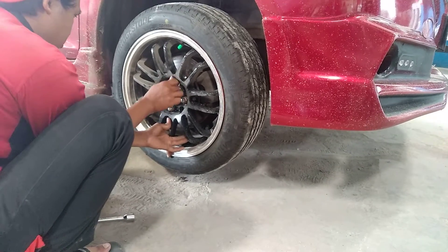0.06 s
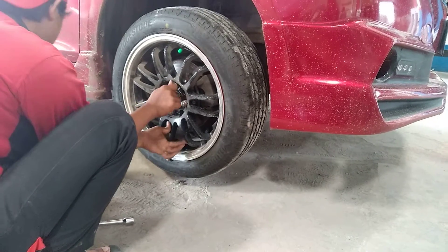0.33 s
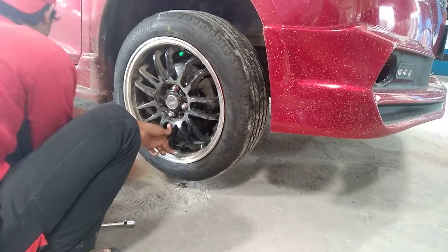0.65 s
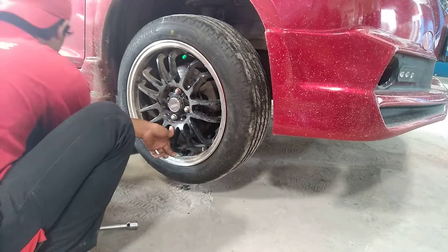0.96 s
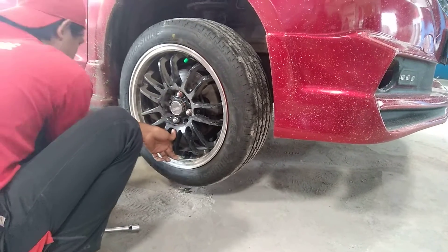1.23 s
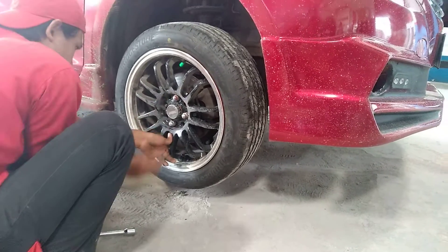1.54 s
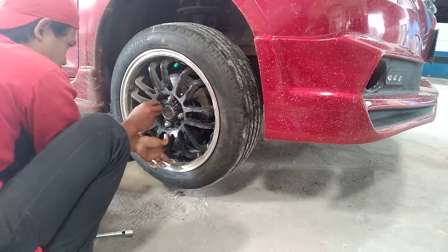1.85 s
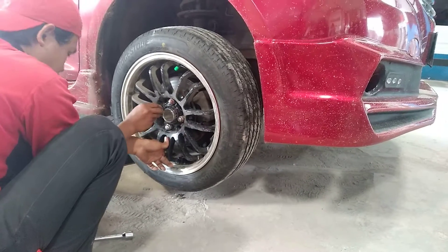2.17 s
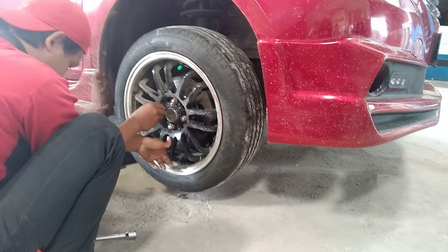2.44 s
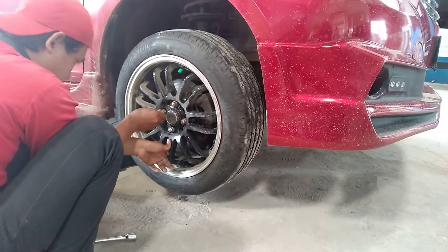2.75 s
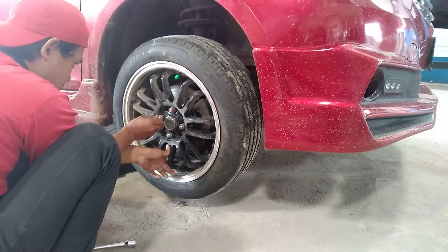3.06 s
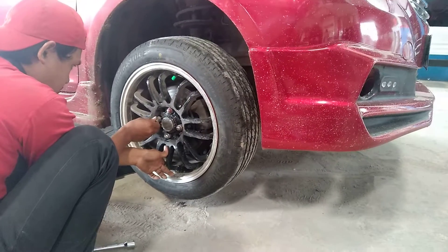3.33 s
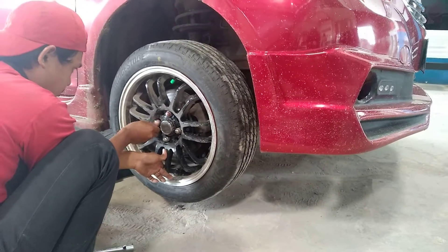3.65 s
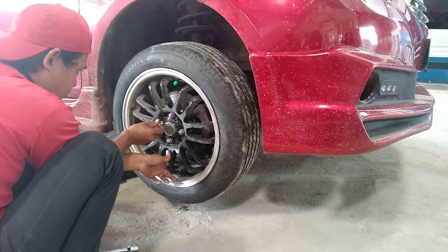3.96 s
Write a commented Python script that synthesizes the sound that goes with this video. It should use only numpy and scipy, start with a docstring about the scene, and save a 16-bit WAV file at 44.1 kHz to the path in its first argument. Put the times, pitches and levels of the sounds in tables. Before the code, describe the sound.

A steady rush of workshop fans with a low motor hum and rumble.

```python
"""Car workshop

Fans and machinery fill the room with a steady rush, a low rumble, faint tones and a thin high whine.
A motor hums at 200 Hz and is switched off near the end. Further away an engine slows down,
with a swell of hiss and a faint squeal of rubbing metal. A wheel nut turned by hand gives one
soft tick, then hands brush over the wheel."""
import sys
import numpy as np
from scipy import signal
from scipy.fft import rfft, irfft
from scipy.io import wavfile
from scipy.ndimage import uniform_filter1d

SR = 44100
rng = np.random.default_rng(int(sys.argv[2]) if len(sys.argv) > 2 else 0)


def dump_mix(stems):
    """Bounce the given channels to the path in sys.argv[1] as a 16-bit WAV at rate SR."""
    frames = np.atleast_2d(stems).T  # one column per channel
    limited = np.clip(frames, -1, 1)  # hard clip at full scale
    pcm = np.round(limited * 32767).astype(np.int16)
    wavfile.write(sys.argv[1], SR, pcm)


N = 176400
T = np.arange(N) / SR


def amp(db):
    """Decibels to gain."""
    return 10 ** (np.asarray(db) / 20)


def unit(x):
    """Scales to rms 1."""
    return x / np.sqrt(np.mean(abs(x) ** 2) + 1e-30)


def curve(rows):
    """An automation lane: straight lines through (time [s], value) points."""
    times, values = np.transpose(rows)
    return np.interp(T, times, values)


def bell(centre, half):
    """A smooth fade in and out, 8.7 dB down at half seconds either side of the centre."""
    return np.exp(-((T - centre) / half) ** 2)


def coloured(points):
    """Noise shaped by an EQ curve of (frequency [Hz], level [dB]) points, rms 1."""
    hz = np.fft.rfftfreq(N, 1 / SR)
    point_hz, point_db = np.transpose(points)
    eq = amp(np.interp(np.log(hz + 1), np.log(point_hz + 1), point_db))
    return unit(irfft(rfft(rng.standard_normal(N)) * eq, N))


def drift(rate):
    """Slow random motion up to about the given rate in Hz, rms 1."""
    hz = np.fft.rfftfreq(N, 1 / SR)
    return unit(irfft(rfft(rng.standard_normal(N)) * (hz > 0) / (1 + (hz / rate) ** 2), N))


def whistle(hz, width):
    """A noisy resonance round a pitch, rms 1."""
    carrier = np.exp(2j * np.pi * np.cumsum(hz * np.ones(N)) / SR)
    return unit((carrier * (drift(width) + 1j * drift(width))).real)


def turbulent(x, patchy_db, flicker_db):
    """Roughens a noise: small patches of the spectrum come and go, and the whole flickers; rms 1."""
    spectrum = signal.stft(x, nperseg=512, noverlap=384)[2]
    patches = uniform_filter1d(rng.standard_normal(spectrum.shape), size=9, axis=0)  # across frequency
    patches = unit(uniform_filter1d(patches, size=22, axis=1))  # across time
    mottled = signal.istft(spectrum * amp(patchy_db * patches), nperseg=512, noverlap=384)[1][:N]
    return unit(mottled * amp(flicker_db * drift(13)))


def add(mix, s, sound):
    """Mixes a sound in at a time in seconds."""
    part = mix[round(s * SR):][:len(sound)]
    part += sound[:len(part)]


def fans():
    """The bed: rushing air with wavering tones and whines, over the room's rumble; all sink slowly."""
    # EQ of the machinery rush (frequency [Hz], relative level [dB])
    rush_eq = [(150, -31), (250, -5), (313, 1.7), (378, -4.5), (450, -2.5), (657, -4.5), (729, -2.5),
               (928, -7), (1010, -5), (1270, -7.5), (1820, -8), (3050, -14), (8160, -24.5), (8750, -27),
               (10900, -35), (13200, -33), (15500, -43)]
    # fan tones and whines (pitch [Hz], width [Hz], level before the fade [dB])
    fan_tones = [(519, 33, -53), (753, 1.6, -55), (844, 3, -59.5), (1105, 7.3, -65), (1544, 15, -57.5),
                 (1811, 220, -56.5), (3297, 190, -59), (4010, 79, -65.5), (4340, 130, -61),
                 (6570, 530, -64), (8840, 81, -63.5), (9040, 43, -75), (10230, 300, -71.5),
                 (12880, 200, -77)]
    # EQ of the room's rumble (frequency [Hz], relative level [dB])
    rumble_eq = [(8, -21), (25, -5), (38, 2), (70, -2), (88, 0), (103, -2), (140, -2.5), (178, -7.5),
                 (270, -12), (400, -26), (800, -64)]
    waver_db, air_db_per_s, rumble_db_per_s = 1.1, -0.5, -0.86
    rush = amp(-38.5) * turbulent(coloured(rush_eq), patchy_db=0.5, flicker_db=0.37)
    whines = sum(amp(db + waver_db * drift(2.7)) * whistle(hz, width) for hz, width, db in fan_tones)
    rumble = amp(-35.5) * coloured(rumble_eq)
    since = T - 2.6  # both fades pass through unity gain at 2.6 s
    return (rush + whines) * amp(air_db_per_s * since) + rumble * amp(rumble_db_per_s * since)


def motor():
    """A clean mains-locked hum that dies away in the room once the motor is switched off."""
    # envelope of the running hum (time [s], level [dB])
    envelope = [(0, -30.5), (.28, -28), (.6, -29), (.8, -30.7), (1, -29), (1.4, -30.5), (1.65, -31.5),
                (1.85, -29.7), (2.8, -30.5), (3.3, -31.5)]
    hum_hz, off_s, t60_s = 200.4, 3.307, 0.87
    phase = 2 * np.pi * hum_hz * T + 0.034 * drift(2.5)
    running_db = curve(envelope) + 0.38 * drift(2.5)
    decay_db = 60 * np.maximum(T - off_s, 0) / t60_s
    return np.sqrt(2) * amp(running_db - decay_db) * np.sin(phase)


def engine():
    """A distant engine slows down; only its lowest orders carry into the room."""
    # falling engine speed (time [s], firing rate [Hz])
    speed = [(0, 50.93), (.65, 49.8), (1.3, 45.2), (1.8, 42.6), (2.3, 37.93), (2.8, 35.02), (4, 34.77)]
    # level of the drone, which swells and dips as it glides (time [s], level [dB])
    envelope = [(0, -28), (.17, -23.5), (.3, -28.5), (.45, -22), (.58, -29), (.68, -24), (.82, -33.5),
                (1.05, -41), (1.25, -34), (1.37, -24.5), (1.48, -41), (1.55, -23.5), (1.66, -29),
                (1.79, -21.5), (1.95, -36), (2.13, -44), (2.31, -30), (2.5, -42), (3.25, -36), (4, -42.5)]
    # engine orders (multiple of the firing rate, relative level [dB])
    orders = [(1, -4.5), (1.5, -19.5), (2, -25), (3, -26.5)]
    firings = np.cumsum(curve(speed) * (1 + 0.0084 * drift(4.3))) / SR
    drone = sum(amp(db + 1.9 * drift(4.4)) * np.sin(2 * np.pi * (order * firings + rng.random()))
                for order, db in orders)
    return np.sqrt(2) * amp(curve(envelope)) * drone


def hiss():
    """A soft upper-mid hiss that builds, crests and drops away."""
    # envelope of the swell (time [s], level [dB])
    envelope = [(0, -72), (.65, -51.5), (.95, -43), (1.25, -43), (1.53, -42), (1.65, -37.5), (1.8, -45.5),
                (2.1, -52), (4, -68)]
    # EQ of the hiss (frequency [Hz], relative level [dB])
    hiss_eq = [(400, -14), (750, -3.5), (1100, -3), (1600, 0), (2400, -3), (3300, -17), (6000, -21),
               (12000, -54)]
    return amp(curve(envelope)) * turbulent(coloured(hiss_eq), patchy_db=1.0, flicker_db=1.0)


def squeal():
    """Rubbing metal sings faintly in rough rings, each with a weaker octave above."""
    # rings (centre [s], pitch [Hz], half length [s], level [dB], relative octave level [dB])
    rings = [(.645, 3065, .07, -54, -7), (.72, 3260, .045, -49, -15), (0.949, 3270, .24, -56, -22),
             (3.092, 6750, 0.035, -55.5, -40)]
    out = np.zeros(N)
    for s, hz, half, db, octave_db in rings:
        ring = whistle(hz, width=70) + amp(octave_db) * whistle(2 * hz, width=70)
        out += amp(db) * bell(s, half) * ring
    return out


def brief_tones():
    """Faint, slightly wavering tones rise out of the rush for a moment."""
    # tone swells (centre [s], pitch [Hz], half length [s], level [dB])
    swells = [(0.75, 267.6, 0.084, -45), (1.093, 147.8, 0.11, -38), (1.495, 266, 0.12, -45.5),
              (1.655, 960, 0.053, -48)]
    out = np.zeros(N)
    for s, hz, half, db in swells:
        phase = 2 * np.pi * hz * T + 0.57 * drift(6)
        out += amp(db) * bell(s, half) * np.sqrt(2) * np.sin(phase)
    return out


def wheel_nut():
    """A nut turned by hand ticks: a soft crack for the attack, a short ring of steel for the tail."""
    # the tick (time [s], ring pitch [Hz], ring peak [dB], time to fall 60 dB [s])
    ticks = [(1.917, 4580, -37, 0.05)]
    # EQ of the crack (frequency [Hz], relative level [dB])
    crack_eq = [(500, -12), (2200, 2), (4500, -3), (7000, -16), (14000, -35)]
    crack_vs_ring_db, crack_decay_s = -1, 0.004
    out, t = np.zeros(N), T[:SR // 4]
    for s, hz, db, t60 in ticks:
        crack = amp(crack_vs_ring_db) * coloured(crack_eq)[:len(t)] * np.exp(-t / crack_decay_s)
        ring = amp(-60 * t / t60) * np.sin(2 * np.pi * hz * t)
        add(out, s, amp(db) * (crack + ring))
    return out


def hands():
    """Soft strokes of skin on the wheel and its nuts, which make the rim ring a little."""
    # hand strokes (centre [s], half length [s], level [dB])
    strokes = [(2.193, .12, -54), (2.812, 0.09, -48), (2.959, 0.07, -46.5), (3.095, 0.07, -51),
               (3.447, .15, -51), (3.87, 0.089, -52.5)]
    # EQ of skin rubbing on the wheel (frequency [Hz], relative level [dB])
    friction_eq = [(600, -10), (1300, -3), (1850, 3), (2600, -10), (4500, -6), (7000, -11), (9000, -18),
                   (14000, -34)]
    envelope = sum(amp(db) * bell(s, half) for s, half, db in strokes)
    friction = turbulent(coloured(friction_eq), patchy_db=0.5, flicker_db=1.5)
    rim = amp(-4) * whistle(hz=1913, width=110)
    return envelope * (friction + rim)


def scene():
    """All layers in one mono mix."""
    return (fans() + motor() + engine() + hiss() + squeal() + brief_tones() + wheel_nut() + hands())[None]


def record(dry):
    """A steep high cut at 15.6 kHz."""
    high_cut = signal.firwin(511, 15600, window=("kaiser", 9), fs=SR)
    return signal.oaconvolve(dry, high_cut[None], "same")


dry = scene()
out = record(dry)
dump_mix(out)
```